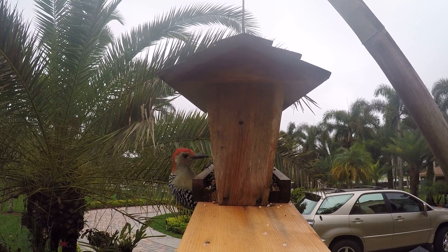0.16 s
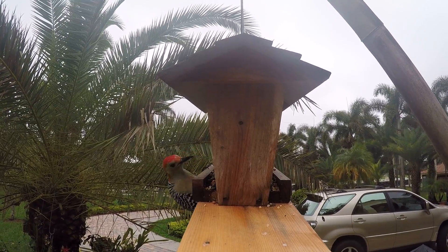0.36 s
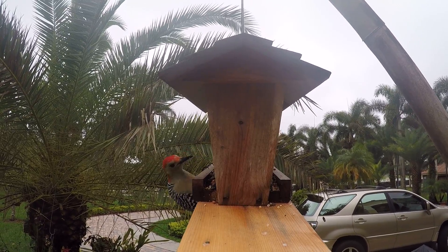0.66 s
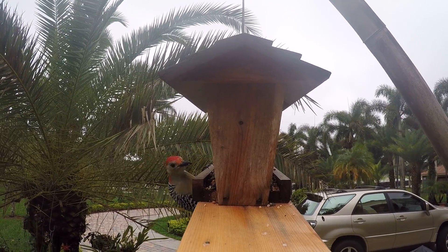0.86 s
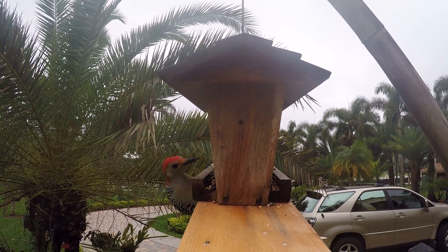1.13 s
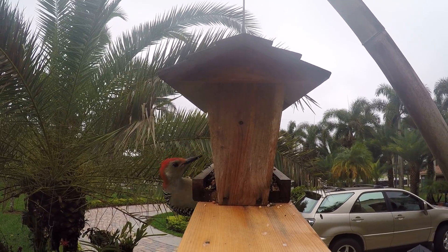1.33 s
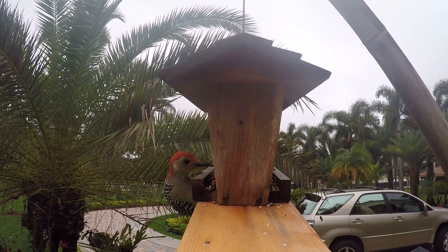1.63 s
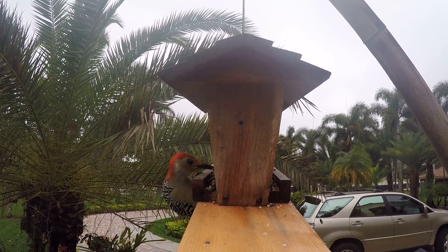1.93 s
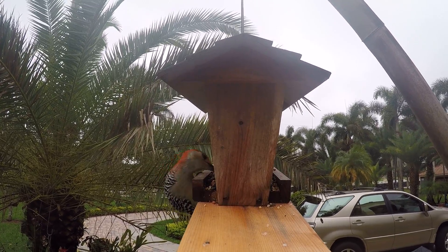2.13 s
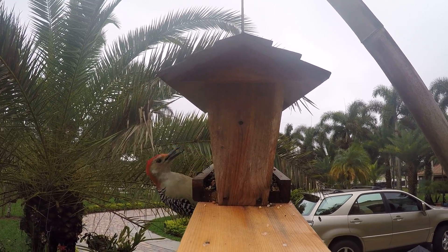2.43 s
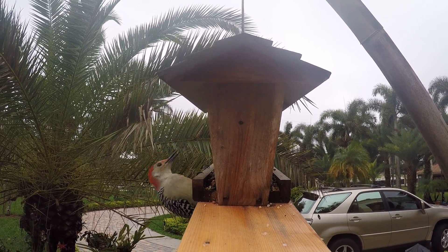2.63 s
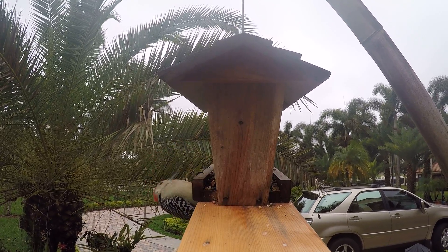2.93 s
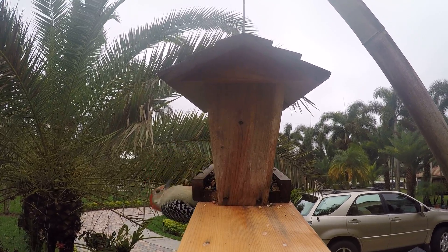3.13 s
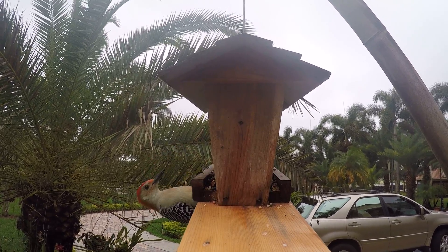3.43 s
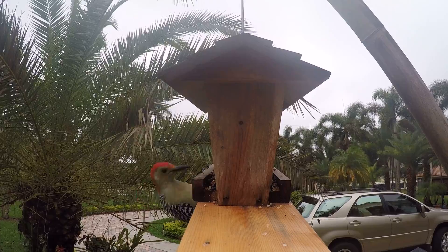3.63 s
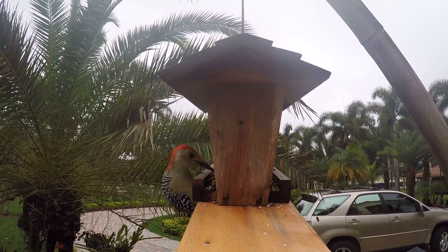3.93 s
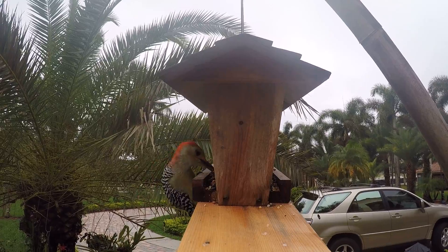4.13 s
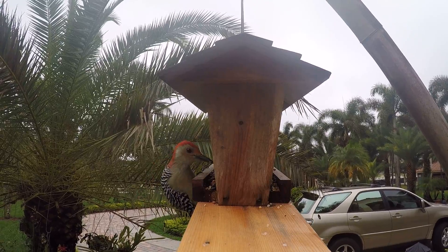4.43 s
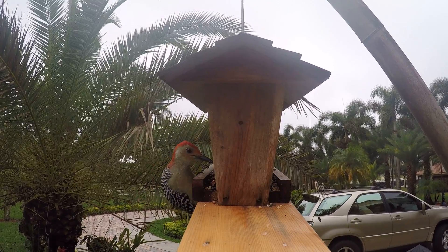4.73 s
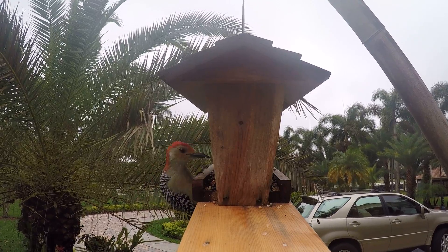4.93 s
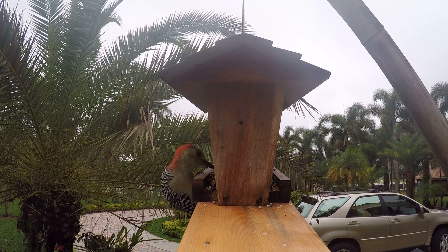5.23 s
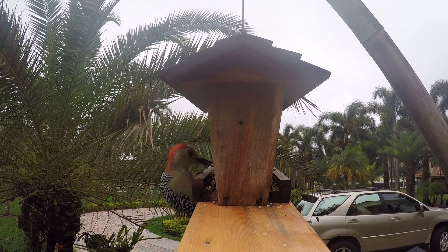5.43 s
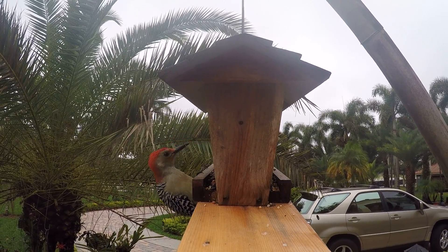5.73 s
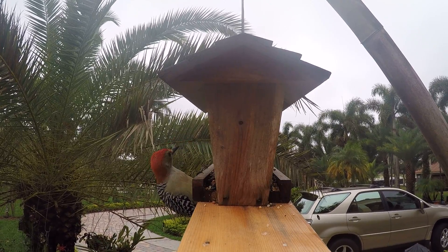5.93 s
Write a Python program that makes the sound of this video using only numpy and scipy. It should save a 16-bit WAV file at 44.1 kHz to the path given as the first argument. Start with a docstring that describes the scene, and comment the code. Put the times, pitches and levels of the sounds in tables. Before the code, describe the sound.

A woodpecker pecks at a wooden feeder in a quiet yard, heard close by a microphone on the same plank. Several sharp, dry knocks land in the first 0.3 seconds, each with a dull thud, and a faint low drone lingers until almost 1 second. From about 1.1 to 1.5 seconds comes the busiest, loudest run of beak taps and rattling claws. Lighter knocks follow near 1.7 and 2 seconds. After a pause, a small group sounds around 3.1 seconds, two soft taps near 4.2, a sharp ringing knock at 5, and another at about 5.7. Underneath, the plank gives a deep, wavering rumble that swells whenever the bird shifts, strongest in the first second and a half. Soft steady hiss with a barely audible thin whine fills the background, and a distant bird calls very faintly near the start and around 2.2 and 3.5 seconds.

```python
"""A wooden feeder in a quiet yard. A woodpecker pecks and shuffles on it: beak and claws ring the
boards in dry knocks and rattles and bend the plank in low thuds. The plank sways under the bird in a
deep rumble and drones briefly after the first blows. Behind are still air, a far bird, and the hiss
and thin whine of a small camera standing on the same plank."""
import sys
import numpy as np
from scipy import signal
from scipy.fft import rfft, irfft, next_fast_len
from scipy.io import wavfile

SR = 44100
rng = np.random.default_rng(int(sys.argv[2]) if len(sys.argv) > 2 else 0)


def store_pcm(level_fs):
    """Save levels as 16-bit WAV."""
    pcm = np.round(np.clip(level_fs, -1, 1) * 32767).astype(np.int16)
    wavfile.write(sys.argv[1], SR, np.atleast_2d(pcm).T)


N = 267510

# Levels are relative: each source adds its trim_db.
# Beak and claw blows: start_s, level_db, thud_db, hollow_db, knock_db, edge_db, low_hz, high_hz, note_db
# Hollow, knock and edge are relative to clack; the struck spot boosts low_hz and high_hz by note_db.
BLOWS = [(0.027, -44.5, -51, -4, 4, -2.5, 900, 1780, 4), (0.042, -36, -40, -24, -1, -16, 766, 1490, 5),
         (0.129, -32.5, -48, -23, -9, -23, 780, 1805, 12.4), (0.231, -53.5, -60, 3, 8, -18, 696, 1680, 11),
         (0.337, -58, -62, -4, -6, -20, 700, 1770, 7), (0.769, -59, -65, -4, 0, -15, 696, 1560, 5.4),
         (1.091, -43, -47, -4, 4, -11, 810, 1260, 3.3), (1.122, -38.5, -56, -19, -15, -13.5, 754, 2100, 12),
         (1.151, -39, -56, -18, 2, -16, 1040, 1410, 5.7), (1.156, -29.5, -47, -20.5, -9, -17, 715, 1475, 5),
         (1.177, -41, -62, -18, 0, -10, 820, 1410, 5), (1.192, -38, -47.5, -8.5, -8, -17, 1130, 1410, 7),
         (1.209, -42.5, -67, -13, 0, -26, 1080, 1420, 7),
         (1.228, -44, -57.5, -10, 0, -18.5, 1080, 1420, 10),
         (1.242, -48.5, -52, -1, 1, -18, 1090, 1270, 8.1), (1.297, -48.5, -60, -6, 0, -14, 1106, 1610, 5.4),
         (1.33, -41.5, -57, -12, -3, -10, 1110, 1380, 5), (1.343, -42, -57.5, -12, 3.5, -9, 834, 1890, 6.8),
         (1.398, -34.5, -56, -13.5, -1.5, -10, 850, 1430, 4.7),
         (1.429, -43.5, -50, -10, -2.5, -29, 806, 1440, 4.1),
         (1.548, -57.5, -79, -14, 3, -23, 1000, 1400, 6.8),
         (1.695, -57.5, -53.5, -4, 0, -19, 1080, 1420, 2.6),
         (1.726, -48.5, -52.5, -4, -3, -12, 710, 2025, 8.4),
         (1.974, -50, -64, -5, 6.5, -16, 817, 1670, 4.2), (2.023, -41.5, -52, -1, -1, -16, 462, 1380, 7),
         (3.039, -46.5, -56.5, -7, 5, -15, 810, 1583, 3.6),
         (3.123, -39, -52, -17, -5, -14.5, 726, 1670, 15), (3.277, -51.5, -61, 2, 5.5, -17, 730, 1670, 8.1),
         (4.176, -53.5, -55, -13, -5, -14, 813, 1807, 3.4),
         (4.327, -54.5, -59, -19, -9, -16, 760, 2089, 6.9),
         (4.984, -37, -58, -11, -8.5, -23, 704, 2100, 19), (5.4, -57.5, -55, 3, 5, -8, 745, 1584, 4),
         (5.655, -42, -60, -13, -5.5, -20.5, 701, 2075, 3)]
# Claw flurries: start_s, length_s, level_db, thud_db, low_hz, high_hz
FLURRIES = [(0.013, 0.072, -45, -50.5, 730, 1680), (1.11, 0.11, -48.5, -56, 1030, 1412),
            (1.32, 0.035, -50, -58, 1090, 1820), (4.974, 0.045, -56, -55, 340, 2080)]
# Stray steps: rate_per_s, level_db, thud_db, low_hz, high_hz
STEPS = (1.47, -65.5, -67, 895, 1650)
# Colour of a light touch, relative to clack: hollow_db, knock_db, edge_db
TOUCH_COLOUR_DB = (-11, -1.1, -16)
# Board registers (hollow, knock, clack, ring, tick, snap): top_hz
REGISTER_TOPS_HZ = [600, 1200, 2250, 3000, 5300, 12000]
# Board modes: pitch_hz, level_db, nominal_t60_s
BOARD_MODES = [(296, -6, 0.019), (359, -5.5, 0.027), (451, -13.5, 0.048), (565, -15.5, 0.06),
               (677.6, -8.5, 0.064), (736, -2, 0.037), (826, -8, 0.064), (990, 2.5, 0.017),
               (1069, -1, 0.031), (1270, -4.5, 0.041), (1410, -1, 0.046), (1618, 3.5, 0.023),
               (1677, 1.5, 0.023), (1803, -6.5, 0.064), (1960, 4.5, 0.011), (2078, -8, 0.071),
               (2473, -1.5, 0.064), (2560, -8, 0.067), (2637, -2.5, 0.078), (2760, -9, 0.024),
               (3423, -3.5, 0.017), (3620, -18.5, 0.033), (4274, -8.5, 0.02), (4250, -40, 0.027),
               (4510, -12.5, 0.017), (4930, -20.5, 0.024), (5760, -11.5, 0.013), (6240, -12, 0.012),
               (6620, -13.5, 0.014), (7850, -19, 0.017)]
# Plank bending modes: pitch_hz, level_db, nominal_t60_s
PLANK_MODES = [(64.5, -9, 0.46), (113.3, 4, 0.07), (123.8, -4, 0.5), (151, -2, 0.1), (203.7, -5.5, 0.17),
               (239, -13, 0.077)]
# Weight shifts of the bird: start_s, level_db, sway_hz
WEIGHT_SHIFTS = [(0.0, -35.5, 26.3), (0.05, -32, 25.3), (0.262, -35.5, 24.76), (0.89, -45, 24.78),
                 (1.049, -34, 27.12), (1.13, -30, 29.3), (1.37, -39, 28.57), (1.759, -38.5, 29.6),
                 (2.01, -40.5, 29.4), (2.341, -38.5, 25.4), (2.788, -45.5, 29.03), (3.138, -36.5, 30.1),
                 (3.8, -49.5, 29.06), (4.012, -42, 26.7), (4.31, -43, 26.2), (4.991, -38, 28.6),
                 (5.38, -38, 30.26), (5.6, -40, 29.9)]
# Plank drone envelope: time_s, level_db
DRONE_ENVELOPE = [(.24, -75), (0.321, -49.5), (.42, -56), (0.751, -60), (.9, -74)]
# Air and hiss spectrum: frequency_hz, relative_density_db
AIR_SPECTRUM = [(35, -30.5), (60, 4.5), (123, -2), (144, -5), (263, -10.5), (309, -12), (381, -13),
                (408, -13.5), (448, -13.5), (480, -15), (816, -18), (1010, -19.5), (2060, -20.5),
                (2980, -20.5), (15000, -33.5)]
# Far bird calls: start_s, length_s, pitch_hz, level_db
BIRD_CALLS = [(0.152, 0.12, 2570, -76), (0.497, 0.16, 2520, -76.5), (2.143, 0.067, 2600, -76),
              (2.391, 0.11, 2420, -81), (3.392, 0.05, 4470, -76), (3.45, 0.118, 4640, -84),
              (3.401, 0.0607, 3000, -77), (3.421, 0.12, 2710, -77.5), (3.773, 0.07, 3140, -78)]


def pecks(contacts, trim_db=-2.08, rise_s=0.0014, skid_s=0.0012, lead_s=0.0008):
    """Each contact rings the boards; where and how hard it lands weights their modes."""
    out, t = np.zeros(N), np.arange(1800) / SR
    attack = t < 0.008
    hz = np.transpose(BOARD_MODES)[0]
    in_register = np.searchsorted(REGISTER_TOPS_HZ, hz) == np.arange(len(REGISTER_TOPS_HZ))[:, None]
    hardest_db = max(row[1] for row in contacts)
    for start_s, level_db, _, hollow_db, knock_db, edge_db, low_hz, high_hz, note_db in contacts:
        free = ring(BOARD_MODES, t, spread_db=2.13, detune=0.0039, damping=1.17)
        slowness = gain_of(0.25 * (hardest_db - level_db))  # light touches land more slowly
        force = tip_force(t, rise_s * slowness, skid_s * slowness)
        driven = signal.fftconvolve(free, force[None], axes=1)[:, :len(t)]
        share = free.std(axis=1) / driven.std(axis=1)  # the skid only roughens; the spot sets energy
        share *= spot_gain(hz, low_hz, 0.033, note_db) * spot_gain(hz, high_hz, 0.07, note_db)
        registers = (in_register * share) @ driven
        ring_db, snap_db = edge_db - 8.5 + 0.95 * note_db, edge_db - 7.5
        balance = gain_of([hollow_db, knock_db, 0, ring_db, edge_db, snap_db])
        blow = (balance / registers[:, attack].std(axis=1)) @ registers
        add(out, start_s - lead_s, gain_of(level_db + trim_db) * blow / blow[attack].std())
    return out


def tip_force(t, rise_s, skid_s, scrape=0.088, scrape_s=0.01):
    """A hard tip skids in, strikes, then scrapes faintly."""
    skid = np.minimum(t / rise_s, 1) * np.exp(-t / skid_s)
    force = rng.standard_normal(len(t)) * (skid + scrape * np.exp(-t / scrape_s))
    force[np.searchsorted(t, rise_s)] += 4  # the strike
    return force


def ring(modes, t, spread_db, detune, damping):
    """One decaying sine per mode; sign, level and pitch vary per blow."""
    hz, level_db, t60_s = np.transpose(modes)[:, :, None]
    side, share, shift = rng.standard_normal((3, len(modes), 1))
    swing = np.sin(2 * np.pi * hz * (1 + detune * shift) * t)
    build_up = 1 - np.exp(-hz * t / 0.98)  # a standing wave forms in about a cycle
    decay = gain_of(level_db + spread_db * share - 60 * damping * t / t60_s)
    return np.sign(side) * decay * build_up * swing


def spot_gain(hz, note_hz, log_width, boost_db):
    """The struck spot brings out the modes near its note."""
    return gain_of(boost_db * np.exp(-0.5 * (np.log(hz / note_hz) / log_width) ** 2))


def rebounds(delay_s=0.005, softer_db=11.5, deeper_db=8):
    """The tip lands again on the same spot, softer and deeper. Rows as in BLOWS."""
    return [(start_s + delay_s, level_db - softer_db, thud_db, hollow_db + deeper_db, *rest)
            for start_s, level_db, thud_db, hollow_db, *rest in BLOWS]


def claw_touches(gap_s=0.011, spread_db=1.5, note_db=10):
    """Claws touch lightly in quick uneven runs and stray steps. Rows as in BLOWS."""
    rows = []
    for start_s, length_s, level_db, thud_db, low_hz, high_hz in FLURRIES:
        draws = rng.uniform(-1.097, 1, (32, 4))
        for offset_s, (late, soft, low, high) in zip(np.arange(0, length_s, gap_s), draws):
            touch_s = start_s + offset_s + 0.256 * gap_s * late
            notes_hz = low_hz * np.exp(0.093 * low), high_hz * np.exp(0.16 * high)
            rows.append((touch_s, level_db - spread_db * soft, thud_db,
                         *TOUCH_COLOUR_DB, *notes_hz, note_db))
    rate_per_s, level_db, thud_db, low_hz, high_hz = STEPS
    for step_s in np.cumsum(rng.uniform(0.5, 1.5, size=32)) / rate_per_s:
        if step_s < N / SR:
            rows.append((step_s, level_db, thud_db, *TOUCH_COLOUR_DB, low_hz, high_hz, note_db))
    return rows


def plank_thuds(contacts, trim_db=-1.86, rise_s=0.002):
    """Each contact bends the plank, which hums on briefly."""
    out, t = np.zeros(N), np.arange(SR // 4) / SR
    early = t < 0.04
    for start_s, _, thud_db, *_ in contacts:
        hum = ring(PLANK_MODES, t, spread_db=2.0, detune=0.014, damping=0.93).sum(axis=0)
        hum *= 1 - np.exp(-t / rise_s)
        add(out, start_s, gain_of(thud_db + trim_db) * hum / hum[early].std())
    return out


def plank_sway(trim_db=3.0, rise_s=0.061, t60_s=2.44, beat_s=0.2, dip_s=0.21, beat_depth=0.48):
    """The lowest mode swells at each weight shift and beats against a close neighbour as it dies."""
    start_s, level_db, sway_hz = np.transpose(WEIGHT_SHIFTS)
    t = np.arange(N) / SR
    coarse_s = t[::200]
    age_s = np.maximum(coarse_s - start_s[:, None], 0)
    onsets = np.sin(np.pi / 2 * np.minimum(age_s / rise_s, 1)) ** 2
    swells = onsets * gain_of(level_db[:, None] - 60 * age_s / t60_s)
    beats = abs(1 - beat_depth * np.exp(2j * np.pi * (age_s - dip_s) / beat_s))
    envelope = np.interp(t, coarse_s, np.linalg.norm(swells * beats, axis=0))
    wobble_db = 1.5 * narrow_noise(0, width_hz=4)
    latest_shift = np.maximum(np.searchsorted(start_s, t) - 1, 0)
    phase = 2 * np.pi * np.cumsum(sway_hz[latest_shift]) / SR
    shudder = gain_of(-23) * narrow_noise(43, width_hz=7)
    return envelope * gain_of(trim_db + wobble_db) * (np.sqrt(2) * np.sin(phase) + shudder)


def plank_drone(pitch_hz=64, width_hz=4):
    """A wavering low tone in the plank swells and dies away."""
    time_s, level_db = np.transpose(DRONE_ENVELOPE)
    envelope = np.interp(np.arange(N) / SR, time_s, gain_of(level_db), left=0, right=0)
    return envelope * narrow_noise(pitch_hz, width_hz)


def air(level_db=-61):
    """Steady yard air and microphone hiss."""
    hz, density_db = np.transpose(AIR_SPECTRUM)
    return gain_of(level_db) * noise(lambda f: gain_of(np.interp(np.log(f + 1), np.log(hz + 1), density_db)))


def far_bird(trim_db=3.0, width_hz=170, fall_hz=150):
    """Hoarse notes, blurred by distance, start quickly, sag in pitch and fade."""
    out = np.zeros(N)
    hoarseness = narrow_noise(0, width_hz)
    for start_s, length_s, pitch_hz, level_db in BIRD_CALLS:
        progress = np.linspace(0, 1, round(length_s * SR))
        tone = np.cos(2 * np.pi * np.cumsum(pitch_hz - fall_hz * progress) / SR)
        envelope = np.sqrt(progress) * (1 - progress)
        note = tone * hoarseness[round(start_s * SR):][:len(tone)] * envelope
        add(out, start_s, gain_of(level_db + trim_db) * unit_rms(note))
    return out


def camera_whine(pulsed_db=-87, steady_db=-89, pulse_hz=30):
    """The electronics sing in two faint bands, one pulsed, one steady."""
    pulse = (0.5 + 0.5 * np.cos(2 * np.pi * pulse_hz * np.arange(N) / SR)) ** 2
    pulsed = unit_rms(pulse * narrow_noise(8550, width_hz=80))
    steady = narrow_noise(11000, width_hz=220)
    return gain_of(pulsed_db) * pulsed + gain_of(steady_db) * steady


def noise(gain):
    """Unit-rms noise with spectrum gain(hz)."""
    size = next_fast_len(N, True)
    spectrum = rfft(rng.standard_normal(size)) * gain(np.fft.rfftfreq(size, 1 / SR))
    return unit_rms(irfft(spectrum, size)[:N])


def narrow_noise(centre_hz, width_hz):
    """A Gaussian band of noise."""
    return noise(lambda f: np.exp(-0.5 * ((f - centre_hz) / width_hz) ** 2))


def gain_of(db):
    """Decibels to amplitude."""
    return np.exp(np.asarray(db) * (np.log(10) / 20))


def unit_rms(x):
    """Scales to an rms of one."""
    return x / np.sqrt(np.mean(x ** 2) + 1e-20)


def add(mix, start_s, sound):
    """Mixes a sound in at start_s."""
    part = mix[max(round(start_s * SR), 0):][:len(sound)]
    part += sound[:len(part)]


def scene():
    """All sources, mono."""
    background = plank_sway() + plank_drone() + air() + far_bird() + camera_whine()
    contacts = BLOWS + claw_touches()
    return (background + plank_thuds(contacts) + pecks(contacts + rebounds()))[None]


def record(dry):
    """Low-pass at 15250 Hz."""
    low_pass = signal.firwin(511, 15250, window=("kaiser", 9), fs=SR)
    return signal.oaconvolve(dry, low_pass[None], "same")


dry = scene()
out = record(dry)
store_pcm(out)
```